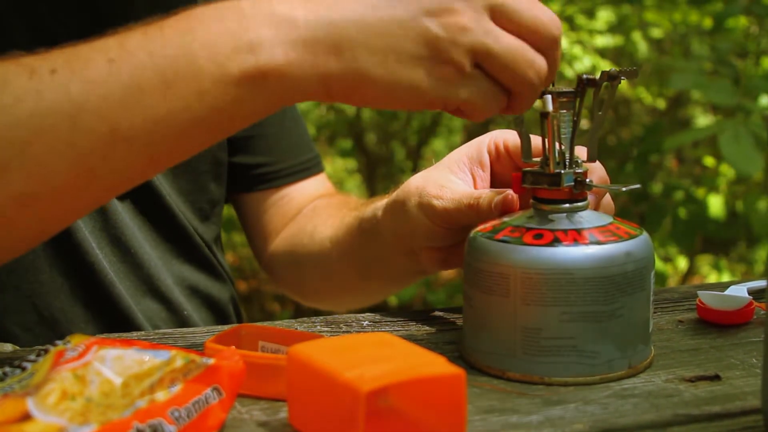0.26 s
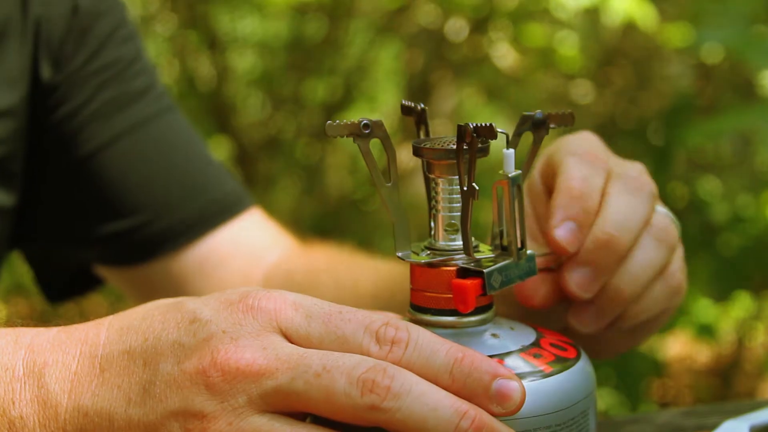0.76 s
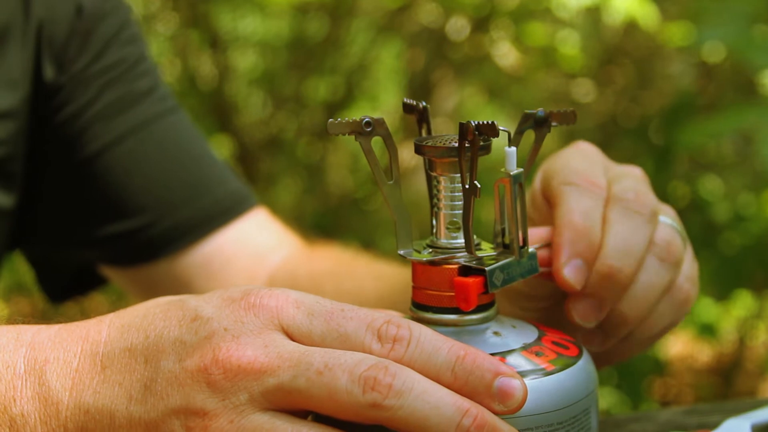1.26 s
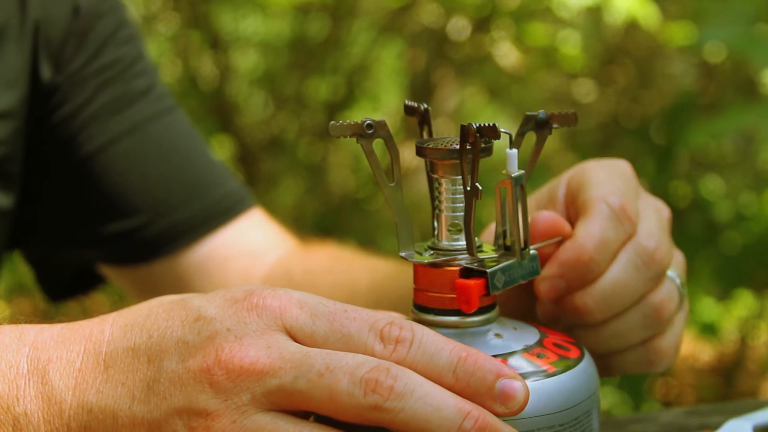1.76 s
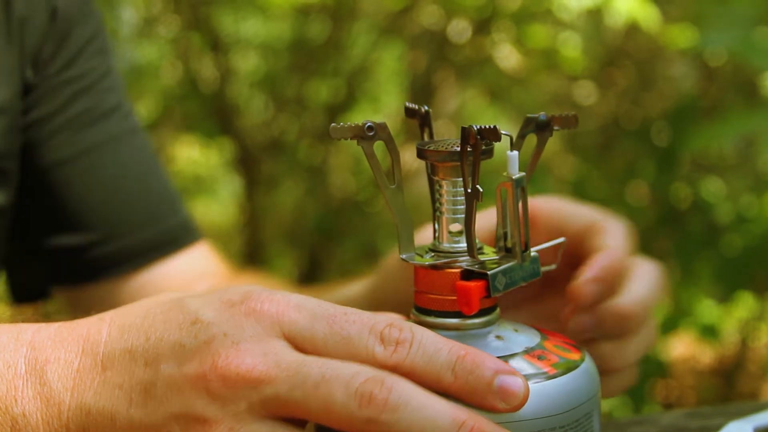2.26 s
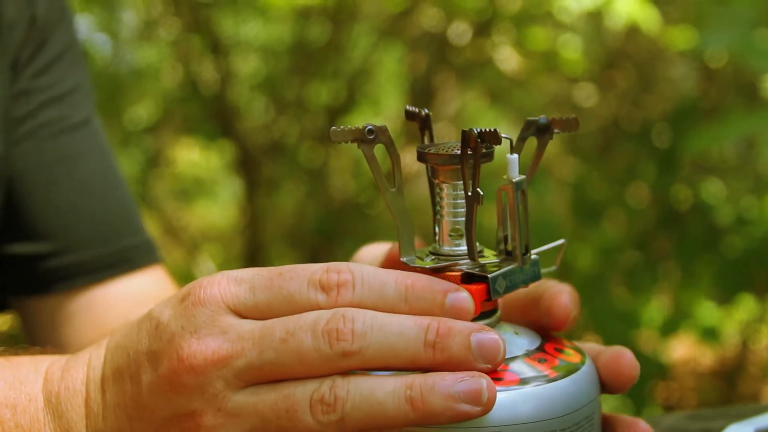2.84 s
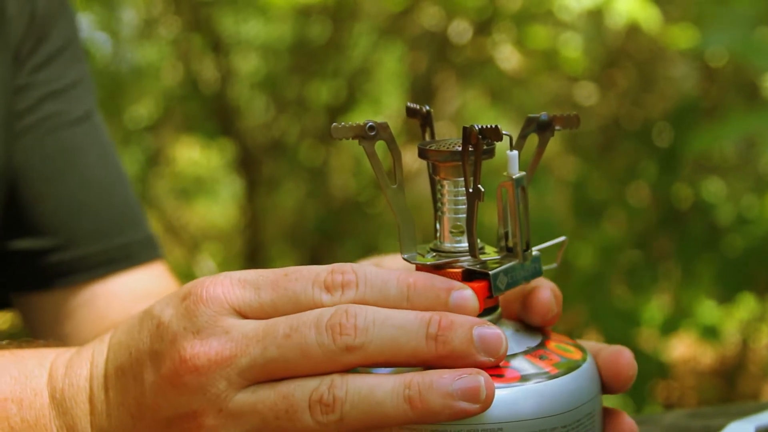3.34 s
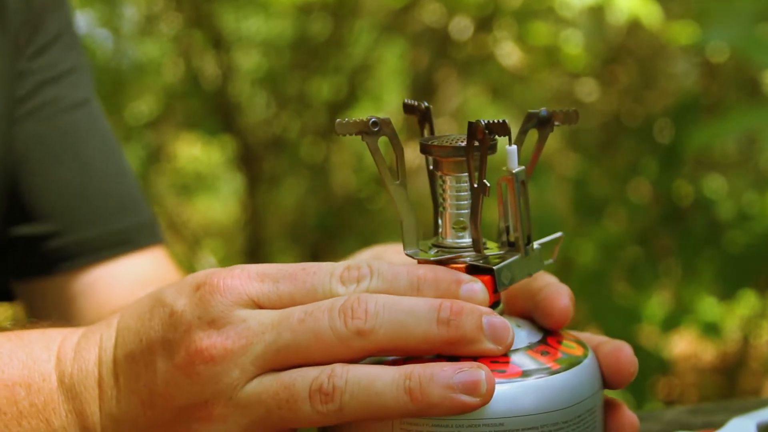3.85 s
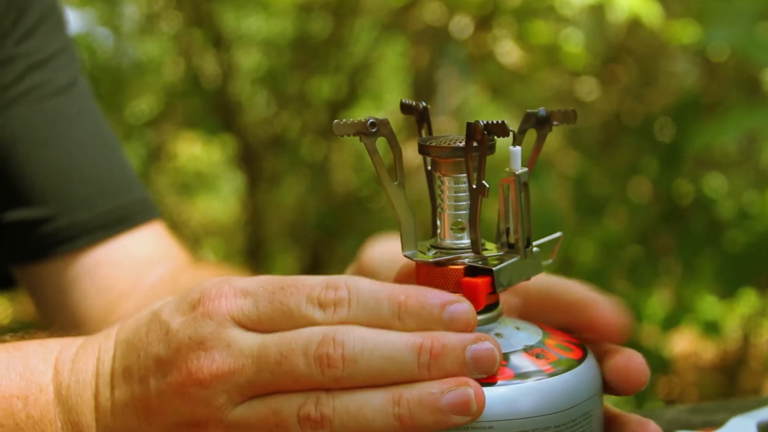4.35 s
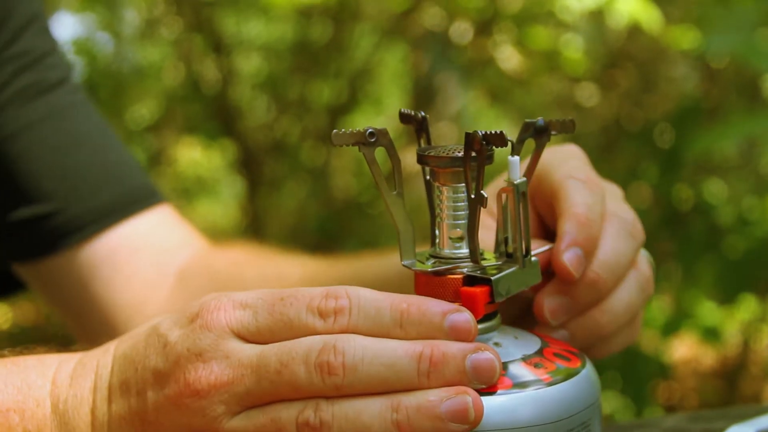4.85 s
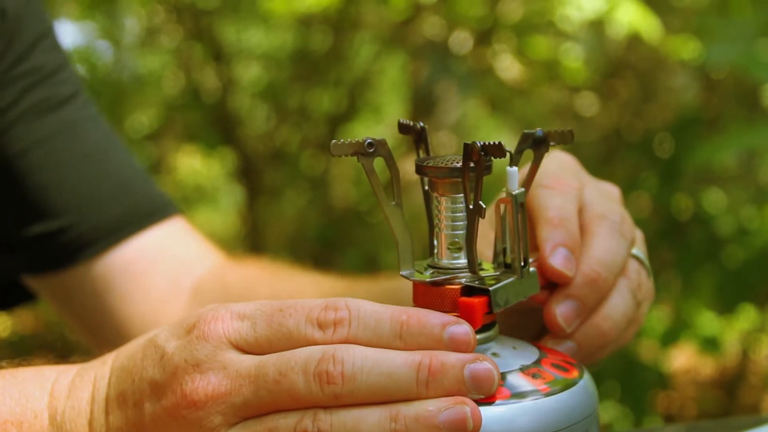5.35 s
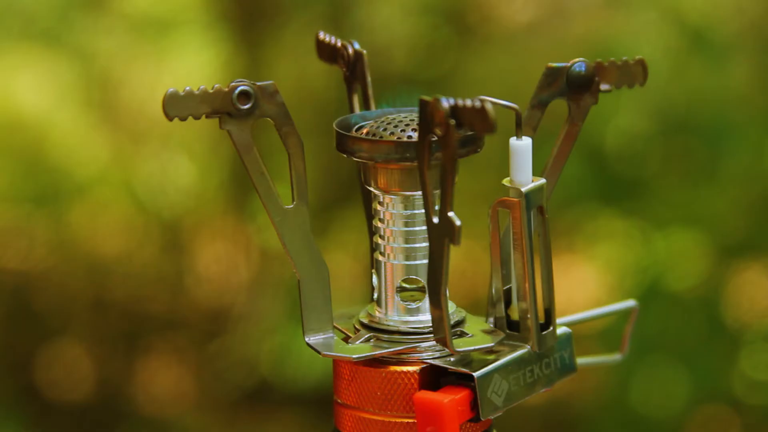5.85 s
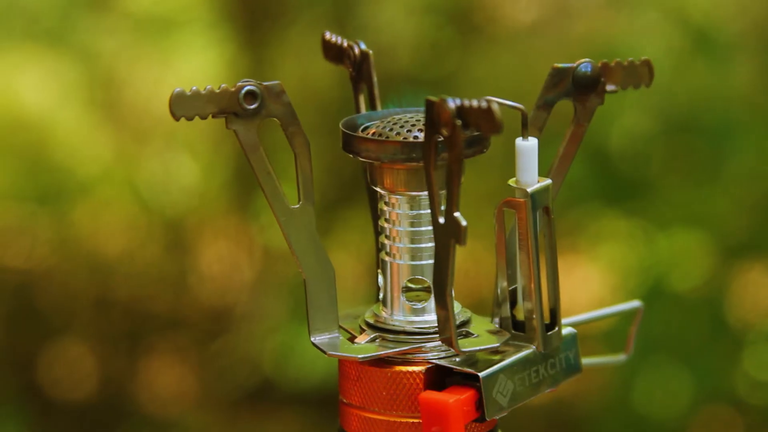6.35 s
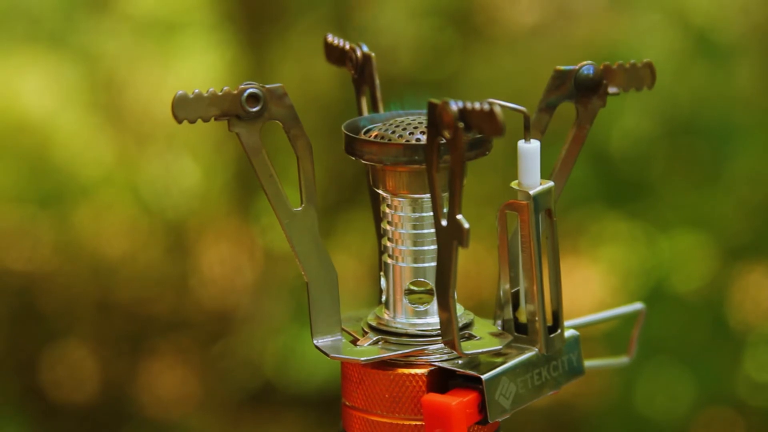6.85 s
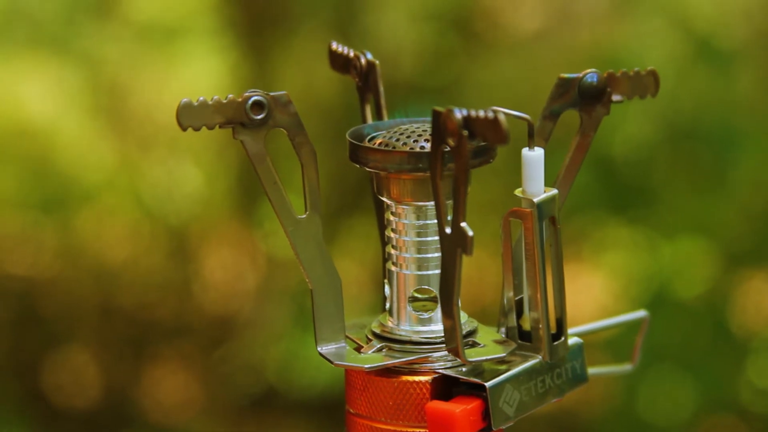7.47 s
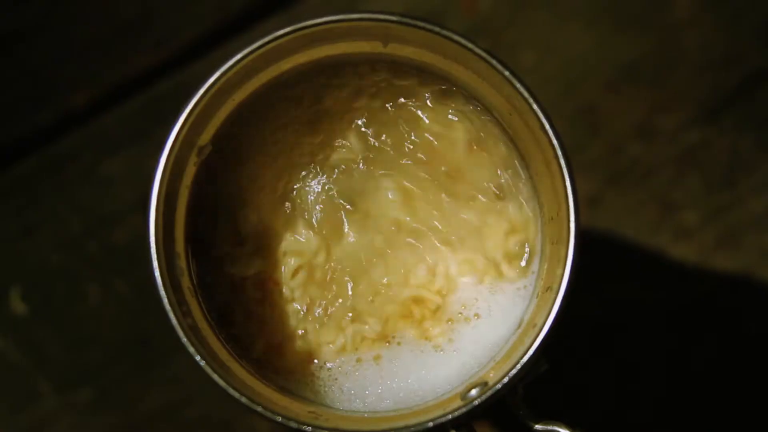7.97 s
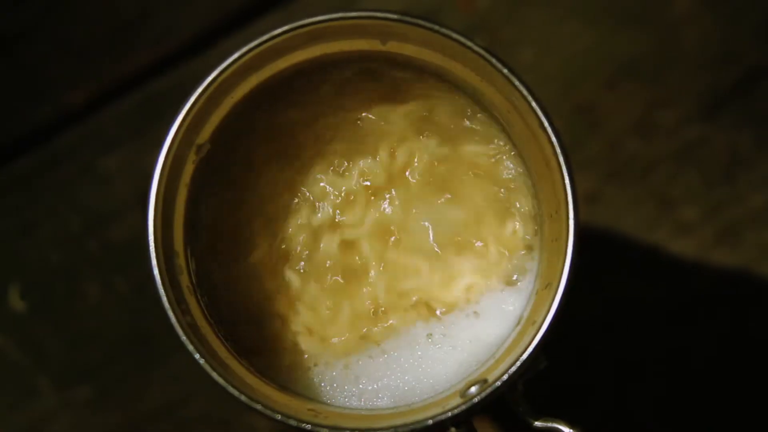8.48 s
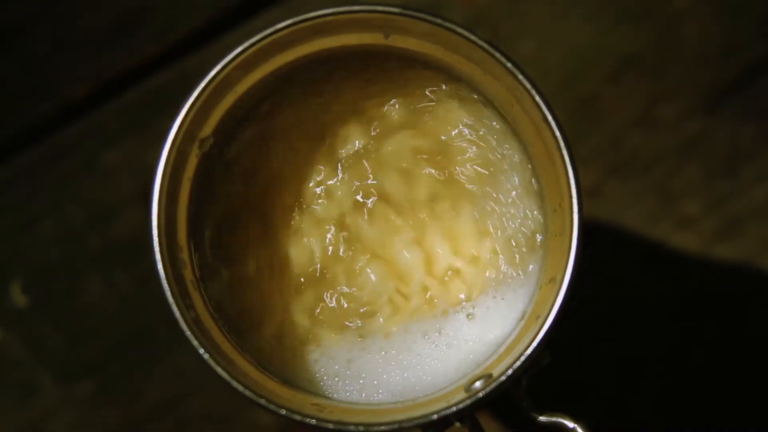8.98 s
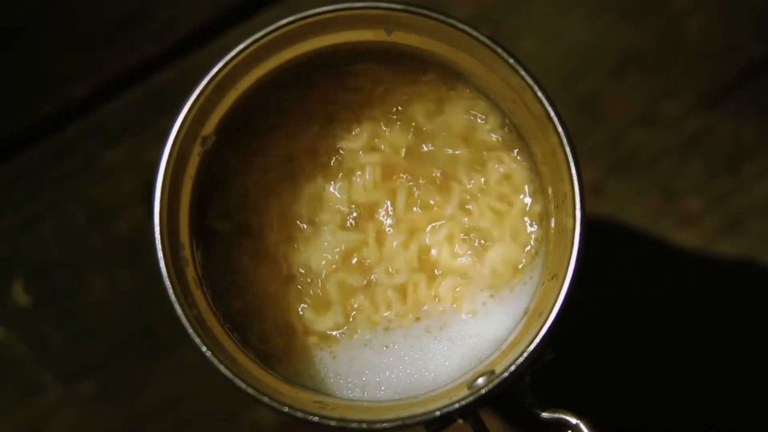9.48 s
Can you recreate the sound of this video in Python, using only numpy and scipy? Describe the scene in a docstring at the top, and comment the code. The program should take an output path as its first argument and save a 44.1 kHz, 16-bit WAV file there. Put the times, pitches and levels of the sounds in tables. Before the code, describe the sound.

Over a faint hush of woods, a small camp stove's steel arm snaps open at about 0.4 seconds with a quick, ringing rattle and a light knock from the gas canister. Gas seeps faintly, then from 1 to 1.6 seconds swells into a strong, bright hiss, its tone shifting slightly as a hand moves around it. At 4 seconds a lighter snaps and the gas catches with a thump and a loud, slightly distorted roar. The sound drops out for an instant at 5.8 seconds, then returns as a softer, fluttering flame with a thin hiss. Hot metal ticks twice just after 6 seconds, and a dull knock and a few pings follow between 7.1 and 7.5. At about 8 seconds it cuts to noodles boiling in a pot, with quick bubble pops and tiny spits over a low, muffled flame, until the end. Everything sounds close.

```python
"""A gas stove in the woods

A small stove's pot support clicks into place, the valve opens and the gas hisses.
A piezo spark (the push-button lighter) lights it, and the roar overloads the sound input.
After a short silence the flame burns on while the hot metal ticks.
Then the sound cuts to the flame muttering under a pot of boiling noodles."""
import sys
import numpy as np
from scipy import signal
from scipy.fft import rfft, irfft, next_fast_len
from scipy.io import wavfile
from scipy.ndimage import map_coordinates

SR = 44100
rng = np.random.default_rng(int(sys.argv[2]) if len(sys.argv) > 2 else 0)


def wav_out(sig):
    """Save sig, one row per channel (or a flat mono array), as 16-bit PCM at SR to the path in sys.argv[1]."""
    wavfile.write(sys.argv[1], SR, np.round(np.clip(np.atleast_2d(sig).T, -1, 1) * 32767).astype(np.int16))


N = 428652
TIME = np.arange(N) / SR
VALVE_S, SPARK_S, CATCH_S = .59, 4.030, 4.034  # gas starts to leak, the lighter snaps, the gas catches
SILENCE_S, FLAME_S, POT_S = 5.805, 5.888, 7.933  # when each later part begins


def from_db(db):
    """Turn decibels into a multiplier: 0 dB is 1, -20 dB is a tenth."""
    return 10 ** (np.asarray(db) / 20)


def rms_one(x):
    """Scale a sound so its average strength (rms) is 1."""
    return x / np.sqrt(np.mean(x ** 2) + 1e-20)


def between(start, end):
    """1 from start to end, else 0."""
    return (TIME >= start) * (TIME < end)


def band(x, low_hz, high_hz):
    """Soften everything below low_hz and above high_hz."""
    sos = signal.butter(2, [low_hz, min(high_hz, .45 * SR)], "band", fs=SR, output="sos")
    return signal.sosfilt(sos, x + 1e-18)


def drift(rate_hz):
    """A random wobble, about 1 in size; a higher rate wobbles faster."""
    hz = np.fft.rfftfreq(N // 20, 20 / SR)
    slow = irfft(rfft(rng.standard_normal(N // 20)) / (1 + (hz / rate_hz) ** 2))
    return np.interp(np.arange(N) / 20, np.arange(len(slow)), rms_one(slow))


def turbulence(spectrum, resonances=()):
    """The rush of swirling gas: noise with a broad tone plus narrow peaks and dips."""
    size = next_fast_len(N)
    hz = np.fft.rfftfreq(size, 1 / SR) + 1e-3
    points, levels = np.transpose(spectrum)
    db = np.interp(np.log(hz), np.log(points), levels)
    db -= 20 * np.abs(np.log(hz / np.clip(hz, points[0], points[-1])))  # fades past the table's ends
    for centre, width, peak_db in resonances:
        db += peak_db / (1 + (2 * (hz - centre) / width) ** 2)
    return rms_one(irfft(rfft(rng.standard_normal(size)) * from_db(db), size)[:N])


def ring(age, hz, fade_s):
    """One note dying away, by 60 dB in fade_s."""
    return np.sin(2 * np.pi * hz * age) * from_db(-60 * age / fade_s)


def crack(age, fade_s):
    """A burst of noise dying away, by 60 dB in fade_s."""
    return rng.standard_normal(len(age)) * from_db(-60 * age / fade_s)


def struck(age, notes):
    """One blow sets all of an object's notes ringing."""
    return sum(from_db(db) * ring(age, hz, fade_s) for hz, db, fade_s in notes)


def play(events, voice):
    """Start voice(age, other columns) at each row's time; age is the seconds since then."""
    out, age = np.zeros(N + SR), np.arange(SR // 4) / SR
    for start, *columns in events:
        at = int(start * SR)
        out[at:at + len(age)] += voice(age, *columns)
    return out[:N]


# The tone of the woods (frequency [Hz], relative level [dB])
WOODS_TONE = [(20, 14.5), (45, -8), (110, 2), (200, -5.5), (300, -7.5), (450, -12.5), (1100, -14.5),
              (2500, -13.5), (3650, -10), (4300, -17), (7000, -22), (9000, -26.5), (15800, -30)]
def woods():
    """A faint, steady rumble and hush."""
    return from_db(-51) * turbulence(WOODS_TONE, [(3700, 410, 2.6)])


# Notes of the gas can and the steel arm (pitch [Hz], relative level [dB], fade time [s])
CAN_NOTES = [(365, -14, .04), (754, -1, 0.037), (874, 0, .035), (1200, -20, 0.03), (2370, -12, 0.016)]
ARM_NOTES = [(5230, -8, .04), (5430, -12, .1), (6360, -12, .04), (7100, -5, 0.15), (7300, -9, .025),
             (8000, -8, .012), (8624, -18, .04), (9200, -22, .06), (10300, -23, .04), (11220, -23, 0.12)]
# Hits as the arm snaps open and bounces, then two light touches (time [s], can level [dB], arm level [dB])
ARM_HITS = [(.3616, -28.5, -37), (.3660, -31.5, -49), (.3724, -28, -30), (.3840, -40, -40),
            (.528, -47, -72), (.588, -53, -68)]
def pot_support():
    """The arm hits its stop and bounces, then is touched twice: the thin steel rings and the gas can knocks."""
    def hit(age, can_db, arm_db):
        click = from_db(-4.5) * band(crack(age, fade_s=.06), 4200, 10500)
        arm = struck(age, ARM_NOTES) + click
        return from_db(can_db) * struck(age, CAN_NOTES) + from_db(arm_db) * arm
    handling = from_db(-47) * rms_one(band(rng.standard_normal(N), 5.5, 49))
    return play(ARM_HITS, hit) + handling * between(0, VALVE_S)


# The tone of the leak (frequency [Hz], relative level [dB])
LEAK_TONE = [(3000, -5), (4800, 2), (7000, -2), (8000, -4), (9000, -18)]
def gas_leak():
    """Gas seeps past the barely open valve with a thin hiss."""
    return from_db(-60.5) * turbulence(LEAK_TONE, [(7400, 120, 8)]) * (TIME > VALVE_S)


def ease(start, length):
    """A smooth move from 0 to 1."""
    return np.sin(np.pi / 2 * np.clip((TIME - start) / length, 0, 1)) ** 2


# Turns of the valve (time [s], length [s], share of full flow added [0-1])
VALVE_TURNS = [(1.084, .38, .33), (1.495, 0.1, 0.66)]
# Tones of the nozzle and the tube that mixes gas with air (frequency [Hz], relative level [dB])
NOZZLE_TONE = [(3000, -25), (4700, -8.5), (6000, -4), (7000, 0), (7800, 1.5), (9250, 0), (9900, -9.5),
               (11000, -17), (12200, -13.5), (14000, -23), (15800, -18.5)]
TUBE_TONE = [(20, -4), (90, -21), (260, -13.5), (420, -19.5), (750, -12), (1100, -14), (1900, -7.5),
             (2700, -7), (3400, -2), (4100, -2.5), (5000, -16.5), (8000, -12)]
# The burner's peaks and dips, bare and with a hand around it (frequency [Hz], width [Hz], boost [dB])
BARE_PEAKS = [(3370, 540, 3), (5130, 150, 1.5), (5100, 130, -3), (6200, 150, 3.5), (6440, 200, -4.5),
              (8460, 240, -2), (8600, 200, 0), (9800, 250, -3.5), (10130, 250, 6)]
CUPPED_PEAKS = [(4700, 160, -4), (5040, 150, 6), (5200, 160, -10), (6060, 160, 3.5), (6280, 170, -10),
                (7670, 800, 3.5), (8170, 150, 6), (8320, 240, -4.5), (8900, 140, 0.5), (9830, 270, -4),
                (10280, 430, 7.5)]
def gas_jet(centre_hz=8800, width_hz=3500, choke_flow=.22):
    """As more gas flows, the nozzle's hiss broadens and the mixing tube rushes louder."""
    flow = sum(share * ease(start, length) for start, length, share in VALVE_TURNS)
    close = closeness()
    hiss = cupped_jet(NOZZLE_TONE, BARE_PEAKS, CUPPED_PEAKS)
    off_centre = 2 * (np.fft.rfftfreq(N, 1 / SR) - centre_hz) / width_hz
    core = irfft(rfft(hiss) / (1 + off_centre ** 10), N)  # a slow jet hisses in this narrow band
    hiss = core + (hiss - core) * flow ** .32
    strength = flow ** 2 / (flow ** 2 + choke_flow ** 2)  # levels off as the nozzle reaches its limit
    nozzle = from_db(-26.5 + 1.45 * close + .6 * (TIME > CATCH_S)) * strength * hiss
    tube = from_db(-35 - .5 * close) * flow * cupped_jet(TUBE_TONE, BARE_PEAKS, CUPPED_PEAKS)
    return hand_echo(nozzle + tube) * from_db(.35 * drift(20))


# Hands at the burner: fingers cupped around the air holes, then a hand resting lightly on the valve, then
# fingers cupped again (time [s], hold [s], closeness [0-1])
HAND_GRIPS = [(2.29, 1.7, 1), (4.5, 1.1, 0.3), (5.66, 0.57, 0.8)]
def closeness(reach_s=.23, loosen_per_s=.31, let_go_s=.4):
    """How snug the fingers are, 0-1: each grip closes, slowly loosens and lets go."""
    grips = []
    for start, hold, close in HAND_GRIPS:
        loosening = 1 - loosen_per_s * np.clip(TIME - start - reach_s, 0, hold)
        letting_go = 1 - ease(start + hold, let_go_s)
        grips.append(close * ease(start, reach_s) * loosening * letting_go)
    return np.clip(np.max(grips, axis=0), 0, 1)


def cupped_jet(tone, bare, cupped):
    """Jet noise whose peaks change as fingers close around the burner."""
    close = closeness()
    return np.sqrt(1 - close) * turbulence(tone, bare) + np.sqrt(close) * turbulence(tone, cupped)


# Notes of the stove under the lighter's hammer (pitch [Hz], relative level [dB], fade time [s])
STOVE_NOTES = [(880, -9, 0.031), (2580, -6, 0.021), (3580, -9.5, 0.033), (10900, -14.5, 0.02)]
# Tones of the newly lit flame (frequency [Hz], relative level [dB])
ROAR_TONE = [(25, -20), (60, -14), (110, -4.5), (190, -0.5), (330, -3), (460, -11.5), (590, -9.5),
             (730, -21.5), (870, -20), (1050, -24), (1300, -19.5), (2000, -23.5), (3000, -31), (6000, -44)]
SIZZLE_TONE = [(4000, 8), (9000, -35), (13000, 1), (15800, 5)]
# Dips in both tones (frequency [Hz], width [Hz], boost [dB])
FLAME_DIPS = [(2800, 450, -3), (4700, 700, -6)]
def ignition():
    """The lighter snaps, pooled gas thumps alight, the button springs back and the flame roars on."""
    def snap(age, spark_db, hammer_db):
        spark = band(crack(age, fade_s=.028), 600, 17000)
        return from_db(spark_db) * spark + from_db(hammer_db) * struck(age, STOVE_NOTES)
    thump = play([(CATCH_S, -2)], lambda age, db: from_db(db) * ring(age, hz=91, fade_s=.045))
    flare_db = 5 * np.exp(-np.abs(TIME - CATCH_S) / .0051)
    roar = from_db(-17 + flare_db + .5 * drift(18)) * turbulence(ROAR_TONE, [(171, 57, .92)] + FLAME_DIPS)
    sizzle = from_db(-38 + .6 * drift(7.7)) * turbulence(SIZZLE_TONE, FLAME_DIPS)
    snaps = play([(SPARK_S, -7, -5), (4.203, -25, -18)], snap)
    return snaps + thump + (roar + sizzle) * (TIME > CATCH_S)


def overload(x, ceiling_db):
    """The input flattens any wave too big for it, which sounds harsh."""
    ceiling = from_db(ceiling_db)
    return np.clip(x, -ceiling, ceiling)


# A hand passing the burner (time [s], length [s], first delay [ms], last delay [ms], strength [0-1])
HAND_PASSES = [(4.15, 0.58, 1.1, 1.06, .17), (5.95, .55, .76, .71, 0.1), (6.38, .42, 1.18, 1.13, .26)]
def hand_echo(x):
    """Sound bounces off a moving hand; the echo cancels some pitches, making sliding dips."""
    out = x
    for start, length, from_ms, to_ms, strength in HAND_PASSES:
        progress = ease(start, length)
        delay = (from_ms + (to_ms - from_ms) * progress) * SR / 1000
        gain = strength * np.sin(np.pi * progress)
        echo = map_coordinates(x, [np.arange(N) - delay], order=3)
        out = (out + gain * echo) / np.sqrt(1 + gain ** 2)
    return out


# Tones of the settled flame and its jet (frequency [Hz], relative level [dB])
FLAME_TONE = [(26, -24), (45, -12), (102, -4.5), (259, 0.5), (395, -3), (468, -6.5), (614, -2),
              (792, -11.5), (892, -11.5), (1020, -16.5), (1150, -11.5), (1560, -14.5), (1880, -20.5),
              (2310, -22.5), (2600, -26), (3380, -60), (5720, -120)]
JET_TONE = [(1500, -6), (2400, -15), (3000, 4), (3650, 4.5), (4100, -5), (5500, -1.5), (8000, -0.5),
            (9700, -2), (10500, -9), (11800, -16.5), (15800, -17)]
# The lit burner's peaks and dips, bare and with a hand near (frequency [Hz], width [Hz], boost [dB])
LIT_BARE_PEAKS = [(4100, 230, -4), (4450, 200, 4), (5020, 350, -4), (5400, 160, 0.5), (6080, 180, -1.5),
                  (6680, 650, 6.5), (7670, 650, -6), (9000, 800, 5), (9850, 370, 4)]
LIT_CUPPED_PEAKS = [(4800, 400, -2), (5470, 250, 4), (6250, 400, -5), (6900, 500, 3), (8200, 300, 2),
                    (8950, 600, 4), (9850, 300, -2)]
def open_flame():
    """The settled flame flutters over a softer jet of gas."""
    flame = from_db(-25.5 + .5 * drift(17)) * turbulence(FLAME_TONE, [(890, 140, 2.2)])
    jet = hand_echo(cupped_jet(JET_TONE, LIT_BARE_PEAKS, LIT_CUPPED_PEAKS))
    return flame + from_db(-37 + .5 * drift(2.9)) * jet


# Notes of the hot metal (pitch [Hz], relative level [dB], fade time [s])
METAL_NOTES = [(850, -6, .014), (1100, -4, 0.013), (1320, -2.5, 0.022), (1795, -5.5, 0.022),
               (2440, -8, 0.014), (2940, -4.5, 0.011), (3860, -2.5, 0.0076), (4900, -17, .01)]
# Its ticks (time [s], relative level [dB], favoured pitch [Hz])
HEAT_TICKS = [(6.1679, -7.5, 2010), (6.3640, -11.5, 3800)]
def metal_ticks():
    """The metal ticks as it heats; notes far from the favoured pitch ring more softly."""
    def tick(age, level_db, favoured_hz):
        out = 0
        for k, (hz, db, fade_s) in enumerate(METAL_NOTES):
            gain = from_db(level_db + db - 1.7 * np.log2(hz / favoured_hz) ** 2)
            out += (-1) ** k * gain * ring(age, hz, fade_s)  # every other note starts downward
        return out
    return play(HEAT_TICKS, tick)


# Pings and knocks (time [s], level [dB], pitch [Hz], fade time [s], click against the note [dB])
STOVE_PINGS = [(7.158, -11, 325, 0.04, -25), (7.3982, -12, 865, 0.076, -2), (7.419, -22, 5060, .016, -1),
               (7.441, -26, 5700, 0.022, 5), (7.474, -16, 3480, 0.015, -14)]
def stove_rattle():
    """The stove knocks dully, then pings and scrapes briefly; each ping has its own amount of click."""
    def ping(age, db, hz, fade_s, click_db):
        click = from_db(click_db) * band(crack(age, fade_s=.01), .61 * hz, hz + 3500)
        return from_db(db) * (ring(age, hz, fade_s) + click)
    scrape = from_db(-40 + 2 * drift(90)) * band(rng.standard_normal(N), 3000, 10000)
    return play(STOVE_PINGS, ping) + scrape * between(STOVE_PINGS[1][0], STOVE_PINGS[-1][0])


# The tone of the covered flame (frequency [Hz], relative level [dB])
COVERED_TONE = [(20, 1.5), (75, -8), (170, -1.5), (240, -3), (370, 1), (520, -6), (660, -20.5),
                (800, -19.5), (1080, -16), (1700, -23.5), (2300, -21.5), (2800, -22.5), (3550, -17.5),
                (5200, -31.5), (15800, -43.5)]
def flame_under_pot():
    """The pot muffles the flame to a mutter."""
    return from_db(-32 + .5 * drift(15)) * turbulence(COVERED_TONE)


# The biggest bubbles (time [s], relative level [dB], pitch [Hz])
BIG_BUBBLES = [(8.14, -23, 1310), (8.251, -25, 1250), (8.352, -28, 1070), (8.444, -27.5, 1050),
               (8.524, -26, 1490), (8.76, -24.5, 1250), (8.996, -25, 1080), (9.12, -26, 1350)]
# The biggest spits of droplets (time [s], relative level [dB])
BIG_SPITS = [(8.1374, -30), (8.4771, -31), (8.6472, -29), (8.9725, -32), (9.0548, -29)]
def boiling_water(count=220, bubbles_per_s=80, calming_db_per_s=1.5):
    """Bubbles burst with short notes, the big ones throwing droplets, over a faint froth."""
    def pop(age, db, hz):
        hollow = ring(age, hz, 12 / hz) + from_db(-5) * ring(age, 1.7 * hz, 9 / hz)
        opening = 1 - np.exp(-age / .00046)  # the note swells as the bubble's skin tears
        return from_db(db + 6) * opening * (hollow + from_db(-14) * crack(age, fade_s=.009))

    def spit(age, db):
        swell = 1 - np.exp(-age / .002)
        return from_db(db - 5) * swell * band(crack(age, fade_s=.033), 5500, 17000)

    def big_pop(age, db, hz):
        return pop(age, db, hz) + spit(age, db - 15)
    # small bubbles come at random, mostly faint and low, and slowly get quieter
    gap, size, pitch = rng.random((count, 3)).T
    after_s = np.cumsum(-np.log(gap)) / bubbles_per_s
    small_db = -42 + 12.5 * size ** 2 - calming_db_per_s * after_s
    small_hz = 986 * 2 ** (.83 * pitch ** 2)
    small = np.c_[POT_S + after_s, small_db, small_hz]
    bubbles = play(BIG_BUBBLES, big_pop) + play(small[small[:, 0] < TIME[-1]], pop)
    froth = rms_one(band(rng.standard_normal(N), 5000, 9900))
    return bubbles + play(BIG_SPITS, spit) + from_db(-60 + 5 * drift(5.7) + 2 * drift(60)) * froth


def scene():
    """Lighting, burning and boiling, one after another, the same in both ears."""
    lighting = woods() + pot_support() + gas_leak() + gas_jet() + ignition()
    burning = open_flame() + metal_ticks() + stove_rattle()
    boiling = flame_under_pot() + boiling_water()
    mono = (overload(lighting, ceiling_db=-12.5) * between(0, SILENCE_S)
            + burning * between(FLAME_S, POT_S)
            + boiling * (TIME >= POT_S))
    return np.array([mono, mono])


# Each input's steady shift from zero before gain, left row then right (shift [share of full scale])
INPUT_OFFSET = [
    [.0353],
    [.0208],
]
def record(dry, flame_db=8.8, pot_db=13, cutoff_hz=15850):
    """The inputs lose the top treble; their offset steps up with gain, and at full gain they hiss."""
    offset_db = flame_db * ease(FLAME_S - .002, .005) + (pot_db - flame_db) * ease(POT_S - .01, .025)
    hiss = from_db(-52) * rng.standard_normal((2, N)) * (TIME >= POT_S)
    treble_cut = signal.ellip(12, .1, 80, cutoff_hz, fs=SR, output="sos")
    return signal.sosfilt(treble_cut, dry + hiss) + from_db(offset_db) * INPUT_OFFSET


dry = scene()
out = record(dry)
wav_out(out)
```